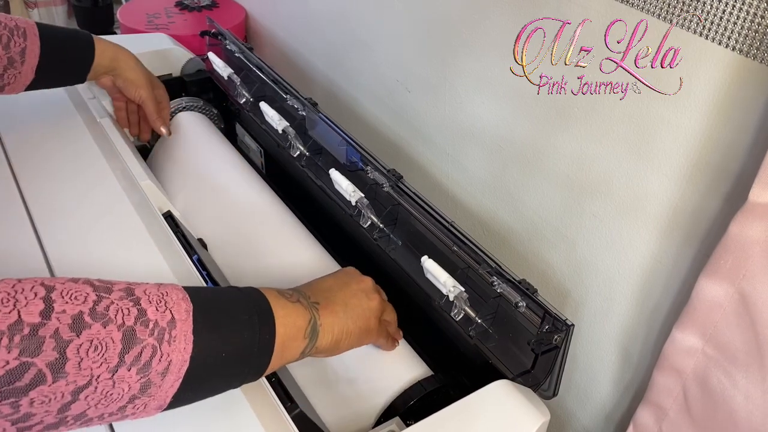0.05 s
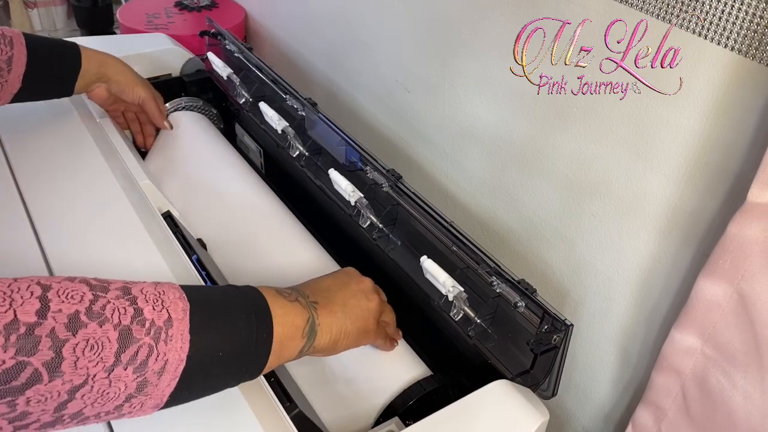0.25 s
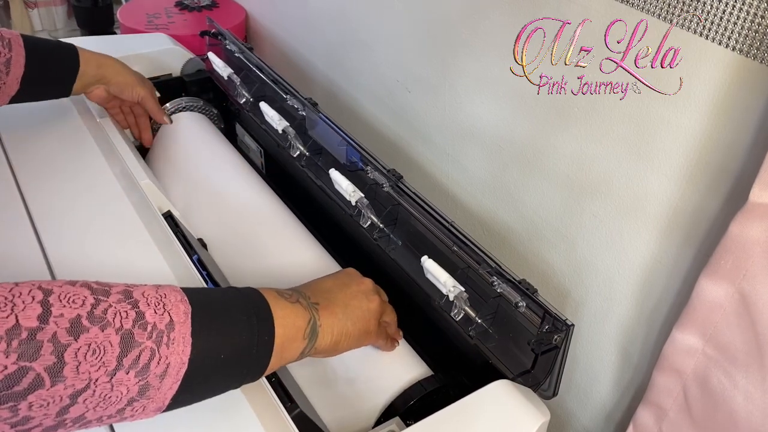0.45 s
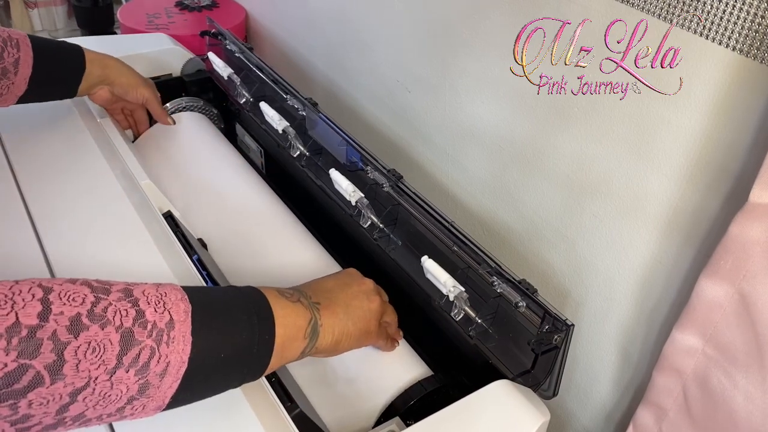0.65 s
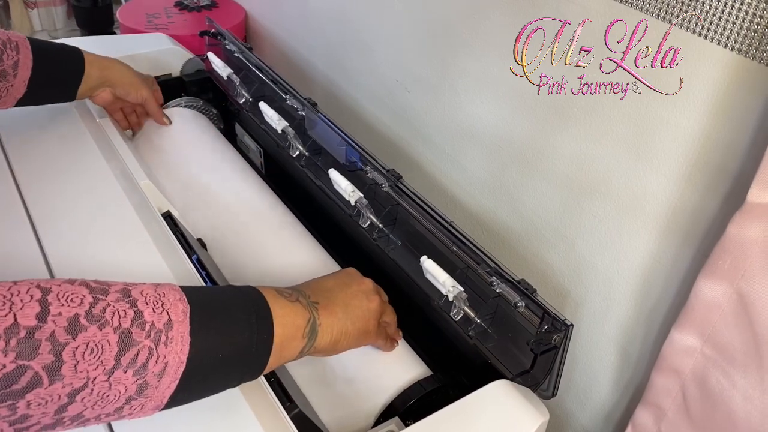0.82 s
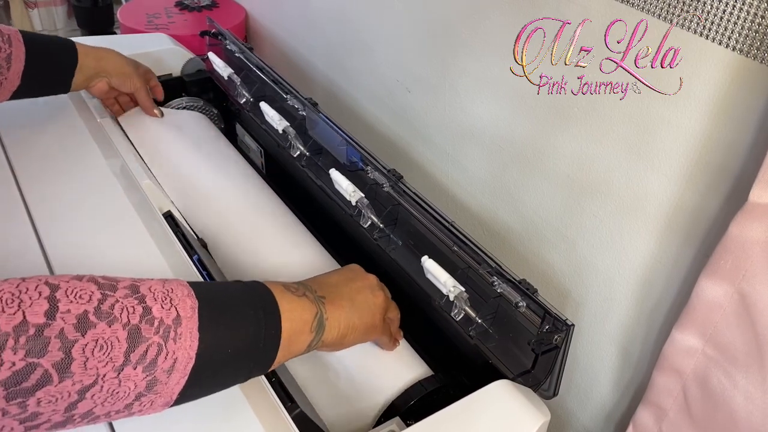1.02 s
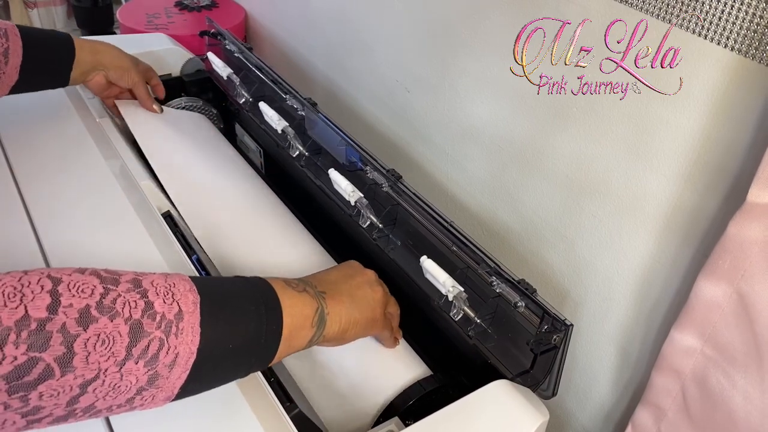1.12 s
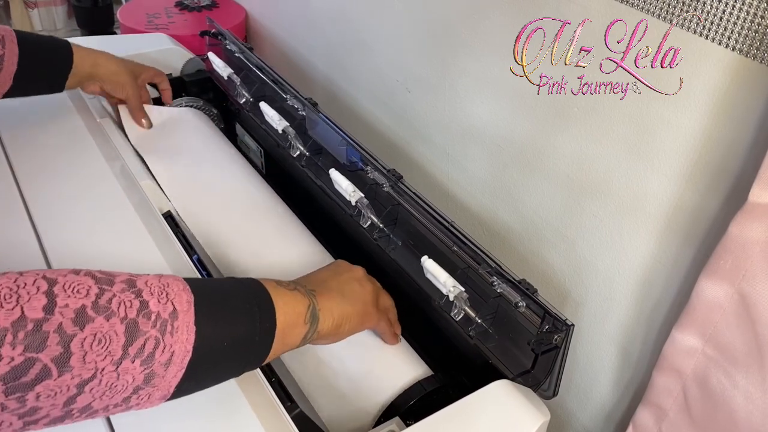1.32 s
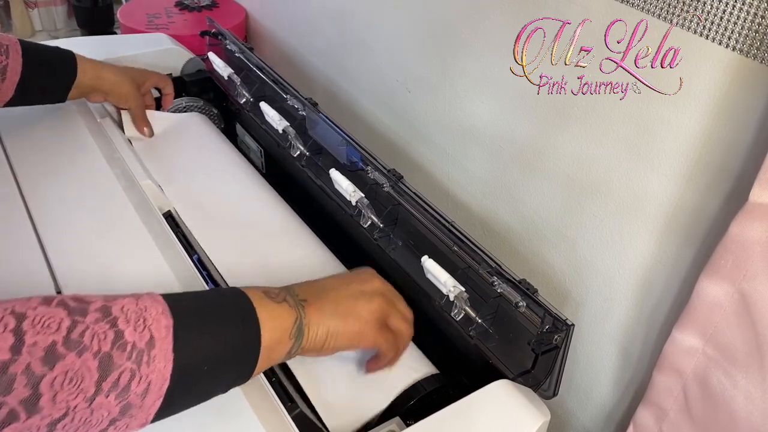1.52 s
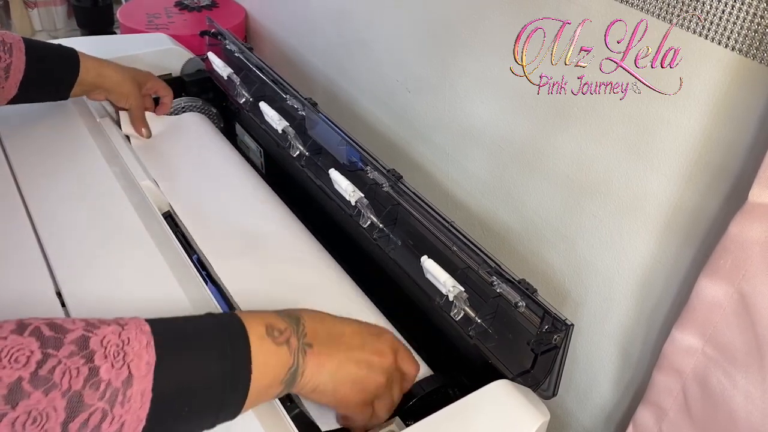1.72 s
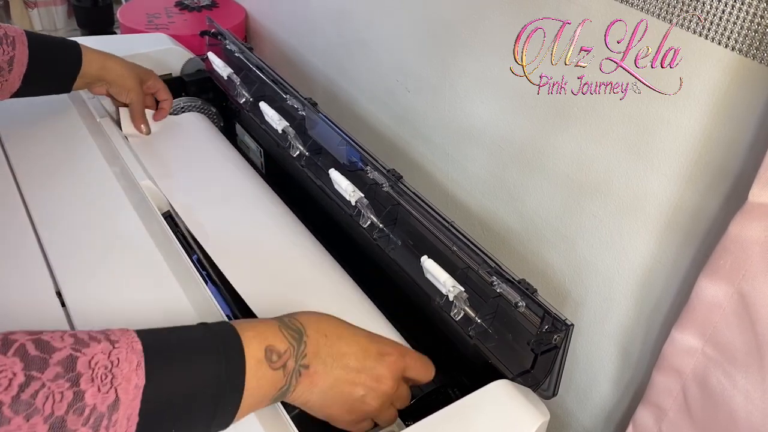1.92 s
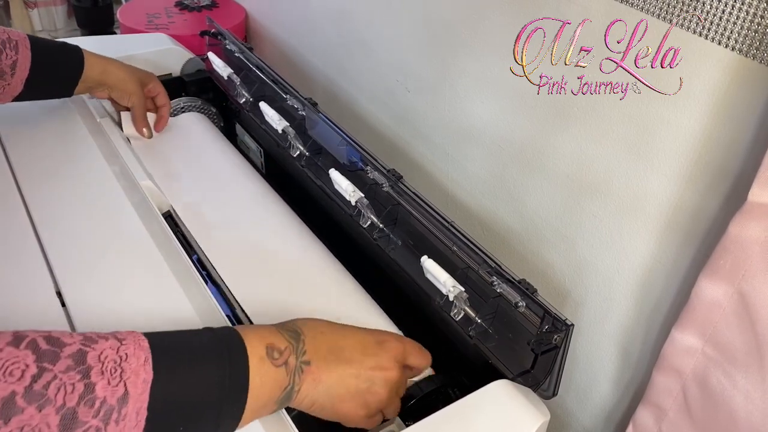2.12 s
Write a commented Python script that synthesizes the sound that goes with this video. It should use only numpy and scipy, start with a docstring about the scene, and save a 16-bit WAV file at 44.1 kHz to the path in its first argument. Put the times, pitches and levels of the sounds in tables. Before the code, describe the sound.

A sharp plastic snap at about 0.2 seconds seats a paper roll in a printer, followed at once by a brief paper swish. Lighter plastic knocks with dull thuds come near 0.9 and 1.1 seconds. Paper slides softly under ticking fingertips until another knock at 1.8 seconds and a faint one just after. Everything is close, in a small, quiet room with a low hum.

```python
"""Sharp plastic snaps, dull bumps and sliding paper: two hands seat a roll in a printer's bay, up close.
The roll holder snaps in and the roll knocks against the housing, each hit a crack with a short ring.
The heavy roll thuds in the bay, fingertips tick, and paper hisses as it slips under the fingers.
A nearby surface throws back a quick echo; a low hum fills the small, quiet room."""
import sys
import numpy as np
from scipy import signal
from scipy.fft import rfft, irfft, next_fast_len
from scipy.io import wavfile
from scipy.ndimage import uniform_filter1d, map_coordinates

SR = 44100
rng = np.random.default_rng(int(sys.argv[2]) if len(sys.argv) > 2 else 0)


def materialize(psi):
    """Save the field psi as 16-bit PCM at rate SR to the path in sys.argv[1].

    A 1-D psi becomes a single channel; in a 2-D psi each row is a channel.
    """
    bounded = np.clip(np.atleast_2d(psi).T, -1, 1)
    quanta = np.round(bounded * 32767).astype(np.int16)
    wavfile.write(sys.argv[1], SR, quanta)


N = 94815
T = np.arange(SR // 2) / SR  # time within one hit
ECHO_S, SIDE_DB = 0.00415, -1.5  # sources are built as (mid, side) pairs

# Tone colour of a hit on hard plastic: freq_hz, gain_db
CRACK_SPECTRUM = [(100, -20.5), (400, -18.5), (900, 7), (2000, 1), (3500, -2), (6300, -6), (7300, -13),
                  (8600, -11), (12000, -17.5), (16000, -19)]


def knocks():
    """Plastic meets plastic: a short crack sets the housing ringing, a little differently each time."""
    # Hard hits: start_s, crack_db, rise_s, crack_t60_s, tilt_db_per_octave, ring_db
    hits = [(.2298, -11, 0.00062, 0.015, -0.5, -36), (0.8573, -23.5, 0.0017, 0.027, 0.75, -38.5),
            (1.0721, -27, .0006, .04, -0.5, -43.5), (1.7888, -26, 0.00088, 0.025, 0.5, -43.5),
            (1.8782, -36.5, 0.0034, .06, 2.1, -51.5)]
    # Resonances of the plastic housing: pitch_hz, level_db, t60_s
    housing_modes = [(431.6, -12.5, 0.11), (573, 1, 0.13), (870, -19, 0.12), (979, 3, 0.11),
                     (1131, 0, 0.062), (1198, -4, .08), (1465, -8.5, 0.083), (1950, 7.5, 0.078),
                     (2190, -9.5, 0.24), (2573, -15, 0.13), (2850, -21, 0.091), (3407, -0.5, 0.12),
                     (4570, -9, 0.12), (5020, -12, .1)]
    out = np.zeros((2, N))
    for start_s, crack_db, rise_s, t60_s, tilt_db, ring_db in hits:
        crack = coloured(noise(len(T)) * strike(rise_s, t60_s), CRACK_SPECTRUM, tilt_db)
        body = sum(amp(mode_db + rng.normal(0, 2.9)) * ring(hz, rise_s, mode_t60_s)
                   for hz, mode_db, mode_t60_s in housing_modes)
        add(out, start_s, amp(crack_db) * crack + amp(ring_db) * body)
    return out


def fingertip_ticks():
    """Light finger taps: a tiny crack with no ring. The last row is no tap but a firmer plastic crack, just
    ahead of the knock at 1.789 s."""
    # Taps, the last row a plastic crack: start_s, level_db, tilt_db_per_octave
    taps = [(.134, -56.5, 10), (.202, -38, -8.5), (.58, -59, -11), (.607, -68.5, 3.5), (.706, -46, -12),
            (.738, -53.5, -1.5), (.814, -39, 0), (1.181, -38, -7), (1.475, -47, 3.5), (1.628, -48, 5.5),
            (1.68, -52, 4), (1.786, -30, -2)]
    out = np.zeros((2, N))
    for start_s, level_db, tilt_db in taps:
        burst = noise(len(T)) * strike(rise_s=0.0011, t60_s=0.027)
        add(out, start_s, amp(level_db) * coloured(burst, CRACK_SPECTRUM, tilt_db))
    return out


def roll_bumps():
    """The heavy roll thuds and sounds the lowest mode of the bay."""
    # Soft landings of the roll: start_s, relative_level_db
    landings = [(.003, -43), (0.235, -47), (0.284, -53), (0.316, -37), (0.386, -43), (.812, -41.5),
                (.861, -37.5), (1.075, -33), (1.191, -49), (1.44, -43), (1.545, -47.5), (1.64, -41.5),
                (1.792, -42.5), (1.819, -40), (1.883, -40), (1.908, -51.5)]
    # Dull body of the thud: freq_hz, gain_db
    thud_spectrum = [(60, -15.5), (140, -9.5), (220, 0), (330, -5), (450, -15), (600, -9.5), (1000, -20),
                     (3000, -65.5)]
    rise_s, t60_s, bay_hz = 0.0045, 0.11, 206.4
    out = np.zeros((2, N))
    for start_s, level_db in landings:
        thud = unit(coloured(noise(len(T)), thud_spectrum)) * strike(rise_s, t60_s)
        tone = amp(4) * ring(bay_hz, rise_s, t60_s)
        add(out, start_s, amp(level_db - 3.5) * (thud + tone))
    return out


def paper_slides():
    """Each slide swells and fades, over the light rub of the gripping fingers."""
    # Swishes of paper, rise and fall each spanning 20 dB:
    # peak_s, relative_level_db, rise_s, fall_s, tilt_db_per_octave
    slides = [(.01, -55.5, .03, .13, -4), (0.169, -57, 0.035, 0.054, -1), (.226, -37.5, 0.018, 0.017, 0),
              (0.287, -25.5, 0.013, 0.025, -2.5), (.384, -43.5, .035, 0.076, -4.5),
              (0.497, -58, 0.1, 0.022, 1), (.82, -42, 0.037, .06, -1.5), (0.946, -41, 0.046, 0.039, 2.1),
              (1.068, -49.5, 0.057, 0.033, 2.5), (1.221, -41, 0.052, 0.065, -1.5),
              (1.295, -50.5, 0.024, 0.058, -6), (1.385, -49.5, .035, .04, -4.5),
              (1.438, -40, 0.066, .055, 1.2), (1.549, -47, 0.1, 0.11, -1.5), (1.662, -47, 0.059, 0.057, -5),
              (1.889, -39.5, .012, 0.028, -3.5), (2.061, -57, 0.049, 0.105, 1), (2.13, -59, 0.075, 0.11, 0)]
    t = np.arange(N) / SR
    gripping = (t > 0.72) & (t < 2.016)
    out = amp(-68) * paper_friction(tilt_db=0) * uniform_filter1d(gripping.astype(float), size=2000)
    for peak_s, level_db, rise_s, fall_s, tilt_db in slides:
        fade_db = 20 * np.maximum((peak_s - t) / rise_s, (t - peak_s) / fall_s)
        out += amp(level_db - 3 - fade_db) * paper_friction(tilt_db)
    return out


def paper_friction(tilt_db, slips_per_s=800, flutter_db=4):
    """Fine hiss plus tiny slips of the paper, fluttering in level."""
    # Tone colour of rubbed paper: freq_hz, gain_db
    paper_spectrum = [(100, -13), (300, -5.5), (700, -3), (1100, 0), (1600, -2), (2200, -3.5), (4000, -9),
                      (6300, -11.5), (7500, -18), (10000, -16.5), (16000, -22)]
    slips = (rng.random(N) < slips_per_s / SR) * noise(N)
    # A smooth curve through random points 500 samples apart.
    flutter = map_coordinates(rng.standard_normal(N // 500 + 4), [np.arange(N) / 500])
    rub = noise(N) + amp(-4.5) * unit(slips)
    return coloured(rub, paper_spectrum, tilt_db) * amp(flutter_db * flutter)


def reverb(mono, decay):
    """Diffuse reflections in mid and side; each frequency dies at its own speed."""
    hz, t, spectrum = signal.stft(rng.standard_normal((2, SR // 2)), SR, nperseg=256)
    fade = amp(-60 * t / along(decay, hz)[:, None])
    tail = signal.istft(spectrum * fade, SR, nperseg=256)[1]
    tail *= np.minimum(np.arange(tail.shape[1]) / (ECHO_S * SR), 1)  # builds until the first echo
    return signal.fftconvolve(mono[None], tail / np.linalg.norm(tail[0]), axes=1)[:, :N]


def room_tone():
    """Low hum and faint air of the room, both steady shaped noise."""
    # Hum, strongest at 60-70 Hz: freq_hz, gain_db
    hum_spectrum = [(20, -37), (36, -22.5), (50, -21), (60, -1), (69, 0.5), (82, -7.5), (98, -2.5),
                    (112, -10.5), (160, -26), (300, -32.5), (600, -69.5)]
    # Dark wash of air: freq_hz, gain_db
    air_spectrum = [(100, 9.5), (350, -0.5), (700, -7.5), (1200, -13), (2500, -25), (6000, -31),
                    (16000, -38.5)]
    hum = unit(coloured(rng.standard_normal((2, N)), hum_spectrum))
    air = unit(coloured(noise(N), air_spectrum))
    return amp(-48) * hum + amp(-58.5) * air


def amp(db):
    """Decibels to gain."""
    return 10 ** (np.asarray(db) / 20)


def unit(x):
    """Scale to rms 1."""
    return x / np.sqrt(np.mean(x ** 2) + 1e-20)


def along(points, hz):
    """Read (freq_hz, value) points on a log frequency axis."""
    freqs, values = np.transpose(points)
    return np.interp(np.log(hz + 1), np.log(freqs + 1), values)


def coloured(x, points, tilt_db=0, keep_power=True, pivot_hz=2000):
    """EQ through (freq_hz, gain_db) points, tilted per octave; keep_power holds white noise level."""
    n = 2 * next_fast_len(x.shape[-1] // 2 + 2048)
    hz = np.fft.rfftfreq(n, 1 / SR)
    octaves = np.log2(np.maximum(hz / pivot_hz, 1 / 4))
    gain = amp(along(points, hz) + tilt_db * octaves)
    cepstrum = irfft(np.log(unit(gain) if keep_power else gain))
    # Fold to minimum phase, so nothing rings ahead of a hit.
    cepstrum[1:n // 2] *= 2
    cepstrum[n // 2 + 1:] = 0
    return irfft(rfft(x, n) * np.exp(rfft(cepstrum)), n)[..., :x.shape[-1]]


def noise(size):
    """White noise as a mid and a weaker side channel."""
    return rng.standard_normal((2, size)) * amp([[0], [SIDE_DB]])


def strike(rise_s, t60_s):
    """Envelope that rises to 1 and dies away."""
    return np.minimum(T / rise_s, 1) * amp(-60 * np.maximum(T - rise_s, 0) / t60_s)


def ring(hz, rise_s, t60_s):
    """One struck mode, with its own phase in mid and side."""
    tone = np.sin(2 * np.pi * (hz * T + rng.random((2, 1))))
    return tone * strike(rise_s, t60_s) * amp([[0], [SIDE_DB]])


def add(track, start_s, sound):
    """Mix a sound into the track."""
    part = track[:, max(round(start_s * SR), 0):][:, :sound.shape[-1]]
    part += sound[..., :part.shape[1]]


def scene():
    """Handling sounds with their quick echo, the bay and the room, a little to the right."""
    # Tight reverb of the plastic bay: freq_hz, t60_s
    bay_decay = [(200, 0.074), (2000, 0.062), (12000, 0.046)]
    # Reverb of the small room: freq_hz, t60_s
    room_decay = [(200, 0.43), (1000, 0.32), (4000, 0.29), (12000, 0.3)]
    # Stereo width, narrow in the bass: freq_hz, side_gain_db
    width = [(60, -15.5), (200, -14.5), (550, -1), (2000, -5.5), (5000, 0), (8500, 4), (11500, -18)]
    direct = knocks() + fingertip_ticks() + roll_bumps() + paper_slides()
    bay = amp(-8) * reverb(direct[0], bay_decay)
    room = amp(-7.5) * reverb(direct[0], room_decay)
    heard = direct + bay + room + room_tone()
    add(heard, ECHO_S, amp(-17.5) * direct)  # bounce off the nearby surface
    mid, side = heard[0], coloured(heard[1], width, keep_power=False)
    return np.array([mid + side, mid - side]) * amp([[-0.74], [0.74]])


def record(dry):
    """A brick-wall high cut takes off the very top."""
    top_hz = 16000
    n = next_fast_len(N + 8192)
    passband = np.fft.rfftfreq(n, 1 / SR) < top_hz
    return irfft(rfft(dry, n) * passband, n)[:, :N]


dry = scene()
out = record(dry)
materialize(out)
```